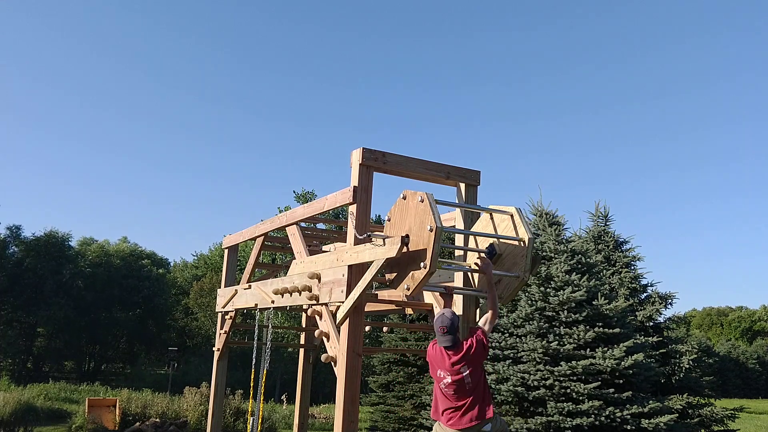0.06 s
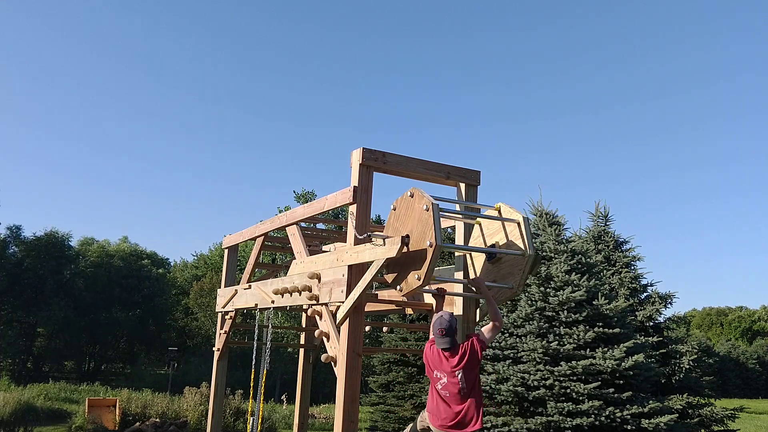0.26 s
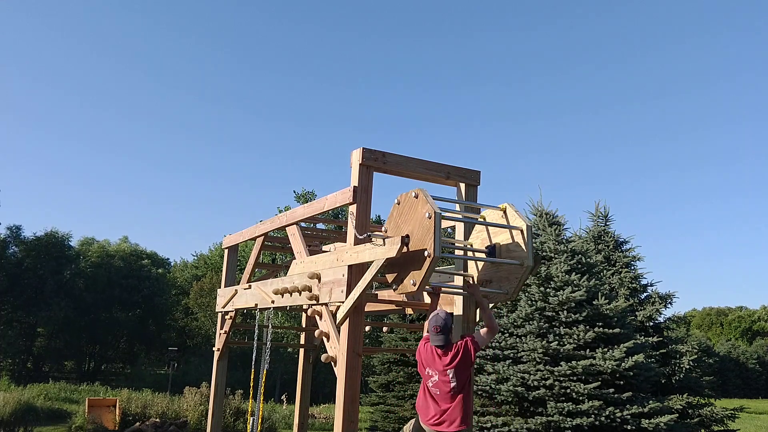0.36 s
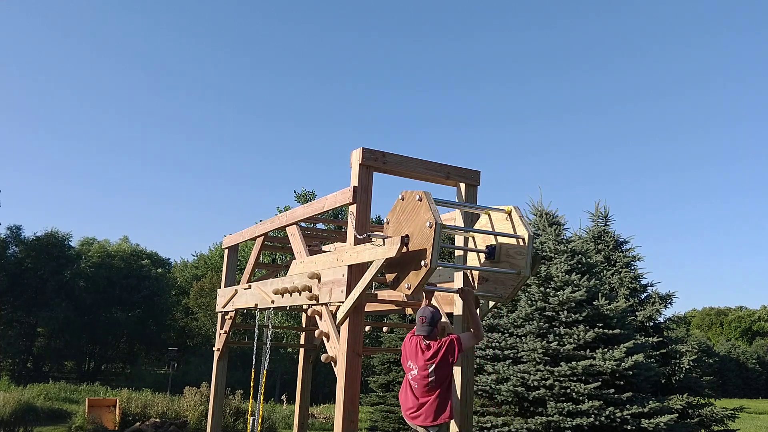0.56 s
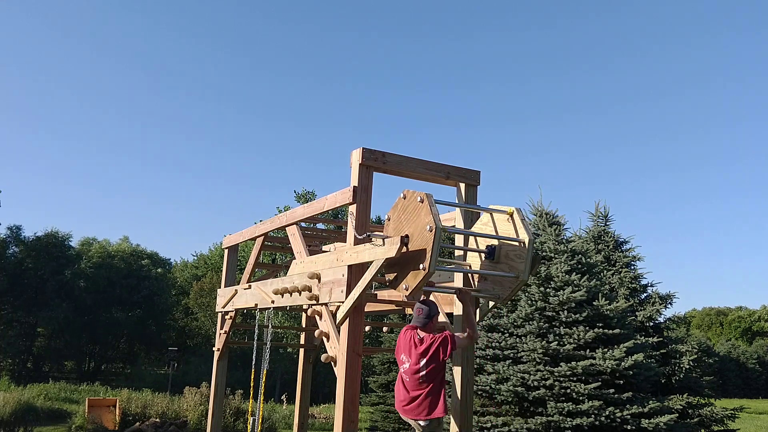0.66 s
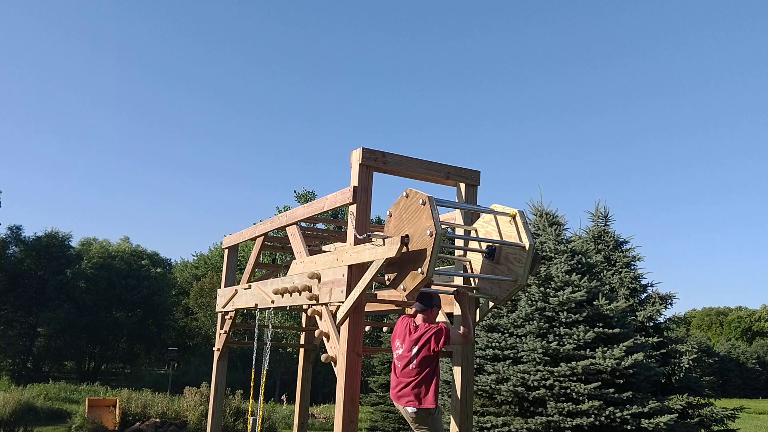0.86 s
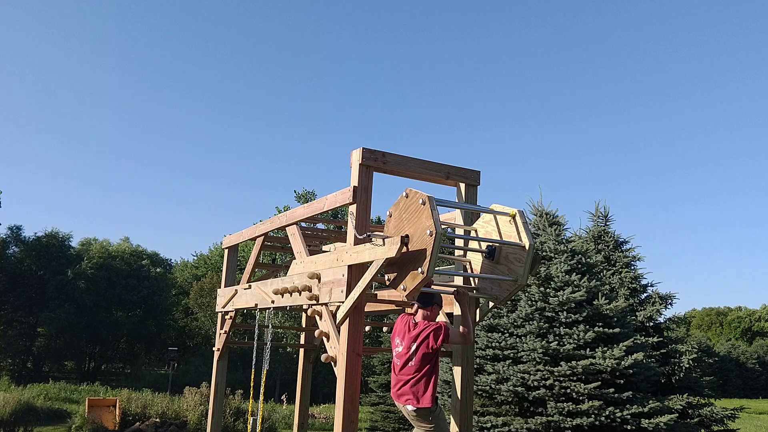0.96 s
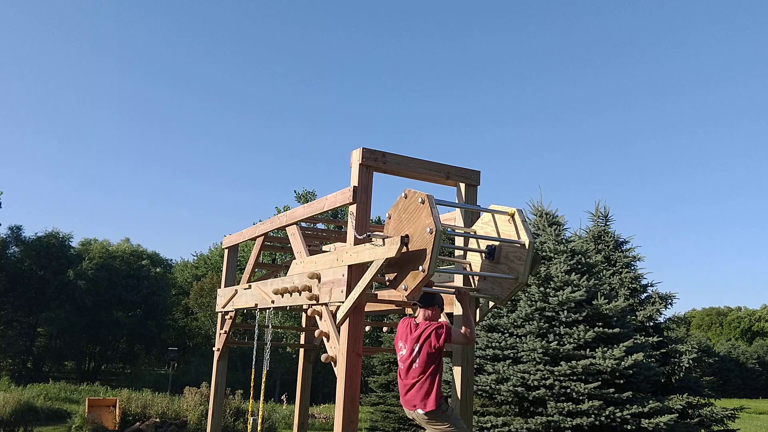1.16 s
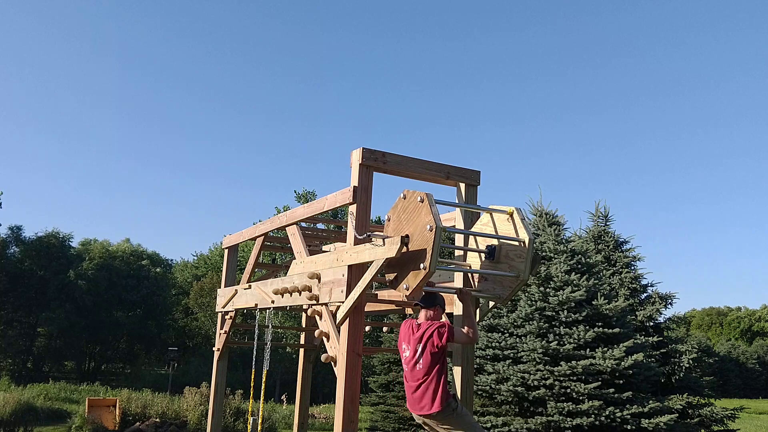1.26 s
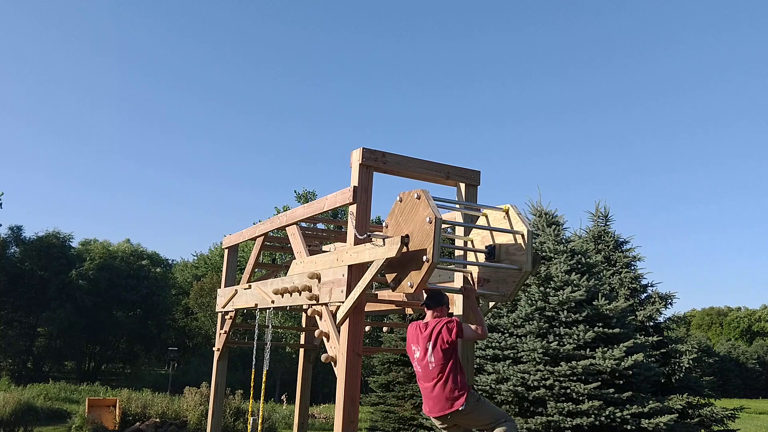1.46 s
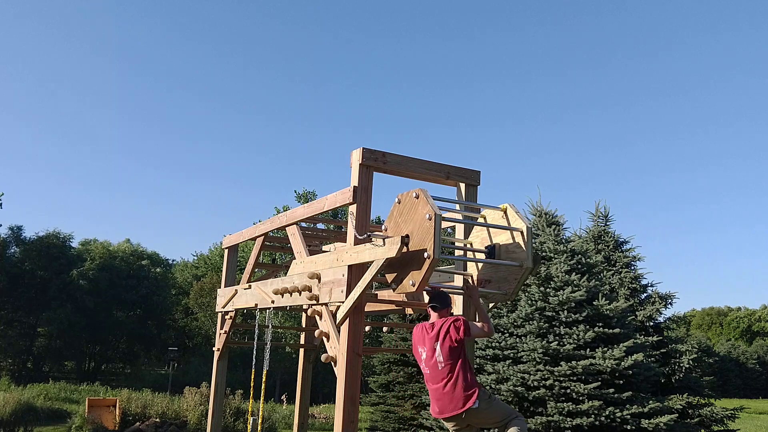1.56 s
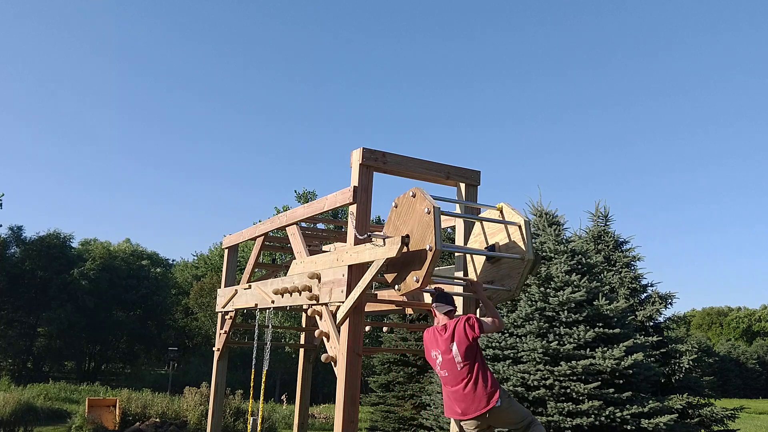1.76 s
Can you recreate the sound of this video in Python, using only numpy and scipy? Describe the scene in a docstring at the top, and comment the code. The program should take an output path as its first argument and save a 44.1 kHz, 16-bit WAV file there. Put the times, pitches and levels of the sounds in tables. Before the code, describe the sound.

A wooden climbing wheel knocks once and rattles, followed by a few faint taps.

```python
"""Rung wheel on a climbing frame

Outdoors at a timber climbing frame. Its big rung wheel knocks against the frame and chatters, with a
faint return from the trees; hands tap the rungs, and the stick-slip of the axle gives one short low creak.
Quiet open air and a far low drone lie behind. The microphone is a phone with two ports."""
import sys
import numpy as np
from scipy import signal
from scipy.fft import rfft, irfft
from scipy.io import wavfile
from scipy.ndimage import uniform_filter1d

SR = 44100
rng = np.random.default_rng(int(sys.argv[2]) if len(sys.argv) > 2 else 0)


def store_wav(level_fs):
    """Save 16-bit WAV to argv[1]."""
    pcm = np.round(np.clip(np.atleast_2d(level_fs), -1, 1) * 32767)
    wavfile.write(sys.argv[1], SR, pcm.T.astype(np.int16))


N = 79380


def undb(db):
    """Decibels to gain."""
    return 10 ** (np.asarray(db) / 20)


def over_hz(table, column=1):
    """A table column interpolated on a log-frequency axis, for every bin of the spectrum."""
    rows = np.array(table, float)
    hz = np.arange(N // 2 + 1) * SR / N
    return np.interp(np.log(hz + 1), np.log(rows[:, 0]), rows[:, column])


def noise(spectrum):
    """Noise shaped by rows of f/Hz, density/(dB per Hz)."""
    return irfft(rfft(rng.standard_normal(N)) * undb(over_hz(spectrum)), N) * np.sqrt(SR / 2)


def since(start):
    """Seconds since a moment, zero before it."""
    return np.maximum(np.arange(N) / SR - start, 0)


def fade(age, t60):
    """A sudden start and an exponential decay."""
    return (age > 0) * np.exp(-np.log(1000) * age / t60)


def gain_curve(points):
    """Gain over time from rows of t/s, level/dB."""
    return undb(np.interp(since(0), *np.array(points).T))


def waver(rate_hz):
    """Smooth random motion with a spread of 1."""
    hold = int(SR / rate_hz)
    steps = np.repeat(rng.standard_normal(N // hold + 1), hold)
    smooth = uniform_filter1d(uniform_filter1d(steps, hold), hold)[:N]
    return smooth / np.std(smooth)


def open_air(waver_db=0.5):
    """Soft outdoor ambience in stereo: the ports share most of the bass and less of the treble."""
    # ambience spectrum: f/Hz, density/(dB per Hz)
    spectrum = [(20, -102), (35, -95), (55, -85), (88, -76.5), (160, -76), (290, -84.5), (450, -84.5),
                (650, -88.5), (850, -87.5), (1250, -93.5), (1700, -96.5), (2300, -99), (3300, -103),
                (4600, -108), (6800, -110), (8400, -106), (10000, -108), (13000, -110), (15500, -114)]
    # its rise and fall: t/s, level/dB
    swells = [(0, 0), (.45, 1.5), (.68, -0.5), (.8, 1), (1.15, -0.5), (1.45, 1.5), (1.62, -3), (1.8, -1)]
    # part that each port hears alone: f/Hz, share/dB
    unshared = [(60, -9.5), (300, -10.5), (1200, -1.5), (3000, -11.5), (6000, 0.5), (15000, -3.5)]
    alone = np.minimum(undb(over_hz(unshared)), 1)
    shared = rfft(noise(spectrum)) * np.sqrt(1 - alone ** 2)
    pair = np.array([irfft(shared + alone * rfft(noise(spectrum)), N) for _ in range(2)])
    return pair * gain_curve(swells) * undb(waver_db * waver(rate_hz=12.37))


def far_drone(centre_hz=87.8, half_width_hz=6.7, base_db=-62.5):
    """A narrow band of low, unsteady noise, as of an engine in the distance."""
    # rise and fall about the base level: t/s, level/dB
    swells = [(0, -19), (.35, 2.5), (.55, 3), (1.35, 5), (1.6, -2.5), (1.8, 8)]
    hz = np.arange(N // 2 + 1) * SR / N
    drone = irfft(rfft(rng.standard_normal(N)) / (1 + ((hz - centre_hz) / half_width_hz) ** 2), N)
    return drone / np.std(drone) * undb(base_db) * gain_curve(swells)


def ring(modes, start, swell_cycles=.9):
    """Struck modes; each swells over its first cycles and dies away."""
    out = np.zeros(N)
    first = int(start * SR)
    span = slice(first, first + SR // 2)
    age = since(start)[span]
    for hz, db, t60 in modes:
        swell = 1 - np.exp(-age * hz / swell_cycles)
        out[span] += undb(db) * swell * fade(age, t60) * np.sin(2 * np.pi * hz * age)
    return out


def timber_grain(start, spread_s=0.0011):
    """The crowd of small timber modes after a blow, and its faint return from the trees."""
    # dense sound between the main modes: f/Hz, density/(dB per Hz)
    spectrum = [(50, -82), (110, -56), (300, -48), (480, -48), (1050, -52), (1700, -62.5), (2300, -67),
                (4000, -90), (9000, -115)]
    age = since(start)
    onset = 1 - np.exp(-age / spread_s)  # waves take a moment to cross the beams
    direct = fade(age, t60=0.076)
    from_trees = undb(-27.5) * fade(age, t60=0.67)
    return noise(spectrum) * onset * (direct + from_trees)


def contact_click(start, db):
    """A hard contact gives a sharp tick with a short fizz behind it."""
    # click spectrum: f/Hz, density/(dB per Hz)
    spectrum = [(1000, -59), (3400, -43.5), (5500, -49.5), (8400, -44), (11000, -45), (13500, -43.5),
                (16000, -56)]
    age = since(start)
    tick = fade(age, t60=0.0037)
    fizz = undb(-11) * fade(age, t60=0.089)
    return undb(db) * noise(spectrum) * (tick + fizz)


def wheel_knocks(modes_db=1.5):
    """The wheel strikes the frame, chatters and settles; a softer contact loses its treble."""
    # contacts: t/s, level/dB, treble cutoff/Hz, click level/dB
    knocks = [(.2270, 1, 2180, -40.5), (.2366, -7.5, 2580, -37.5), (.2422, -7, 880, -39),
              (.2470, -18, 1200, -43), (.2505, -16, 1280, -46), (.2685, -21, 695, -58),
              (.338, -25, 700, -70), (.376, -28.5, 1200, -66), (.384, -22.5, 1500, -53),
              (.408, -24, 700, -59)]
    # modes of the frame: f/Hz, level/dB, t60/s
    frame_modes = [(99.2, -36, 0.2), (171.4, -32, 0.29), (200.2, -30.5, .12), (251, -43.5, 0.18),
                   (401.5, -22.5, 0.085), (480.5, -18.5, 0.12), (507.8, -26, .12), (547.7, -29, 0.11),
                   (625, -40.5, 0.18), (727.5, -29.5, 0.095), (795.4, -32.5, 0.12), (927, -38, 0.081),
                   (1065, -33.5, 0.077), (1112, -36, 0.21), (1231, -42, 0.075), (1390, -35, 0.046),
                   (1500, -54, 0.055), (1686, -32.5, 0.042), (1940, -47, 0.044)]
    out = np.zeros(N)
    for start, db, cutoff_hz, click_db in knocks:
        timber = undb(modes_db) * ring(frame_modes, start) + timber_grain(start)
        lowpass = signal.butter(2, cutoff_hz, fs=SR, output="sos")
        out += undb(db) * signal.sosfilt(lowpass, timber) + contact_click(start, click_db)
    return out


def rung_taps(grain_db=-23):
    """Hands catch the rungs and set them ringing."""
    # hand contacts: t/s, level/dB, click level/dB
    taps = [(0.7483, -1.5, -60), (.754, -6, -56), (0.9296, 1, -51), (.956, -7.5, -63), (1.3497, -5, -45)]
    # modes of a rung in its wheel: f/Hz, level/dB, t60/s
    rung_modes = [(198, -55, 0.31), (398, -44.5, 0.17), (512, -45.5, 0.11), (690, -52, 0.055),
                  (838, -47.5, .07), (1159, -44.5, 0.082), (1215, -46, 0.06), (1433, -52.5, 0.04),
                  (1768, -54.5, .06), (8300, -60.5, 0.075)]
    out = np.zeros(N)
    for start, db, click_db in taps:
        rung = ring(rung_modes, start) + undb(grain_db) * timber_grain(start)
        out += undb(db) * rung + contact_click(start, click_db)
    return out


def axle_creak(start=1.335, slips=12, slip_hz=93.1):
    """Stick-slip in the axle: a short run of slips rings the bearing, swells, holds and dies."""
    # modes of the bearing: f/Hz, level/dB, t60/s
    bearing_modes = [(160, -35, 0.015), (304, -35, 0.023), (470, -48, 0.024), (714, -55, 0.01)]
    attack_s, hold_s, release_s = 0.011, 0.043, 0.033
    modes_db, grain_db = 5, -36
    jitter, scatter_db = 0.051, 2.5  # slips vary in spacing and strength
    out, age = np.zeros(N), 0.
    for gap_draw, size_draw in rng.standard_normal((slips, 2)):
        rise = min(.5 + .5 * age / attack_s, 1)
        fall = np.exp(-max(age - attack_s - hold_s, 0) / release_s)
        bearing = -undb(modes_db) * ring(bearing_modes, start + age)
        timber = undb(grain_db) * timber_grain(start + age)
        out += rise * fall * undb(scatter_db * size_draw) * (bearing + timber)
        age += (1 + jitter * gap_draw) / slip_hz
    return out


def scene():
    """Open air and the far drone behind, the climbing frame in front."""
    return open_air() + far_drone() + wheel_knocks() + rung_taps() + axle_creak()


def record(dry):
    """The phone's two microphone ports differ in level and phase; the top is cut steeply."""
    # left port against right: f/Hz, level difference/dB, phase lead/rad
    ports = [(59, 8, -2.26), (199, 4.5, -1.59), (394, 1, -1.5), (760, -1, 0.4), (1230, 2.5, 0),
             (1710, 0.5, 1.13), (2410, 3, 3.5), (3380, 1.5, 6), (4650, 3, 8.5), (6850, 2, 8), (8000, 8, 8),
             (12800, 0.5, 8)]
    sides = np.array([[.5], [-.5]])
    response = undb(sides * over_hz(ports)) * np.exp(1j * sides * over_hz(ports, column=2))
    stereo = irfft(rfft(dry) * response, N)
    top_hz = 15550
    return signal.sosfilt(signal.ellip(10, .2, 70, top_hz, fs=SR, output="sos"), stereo)


dry = scene()
out = record(dry)
store_wav(out)
```